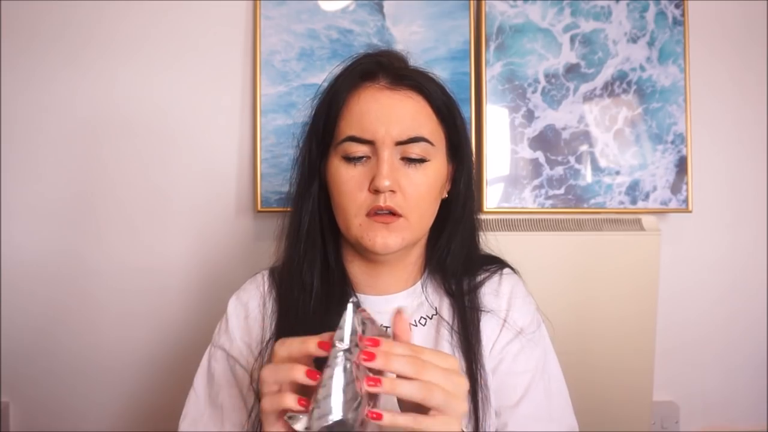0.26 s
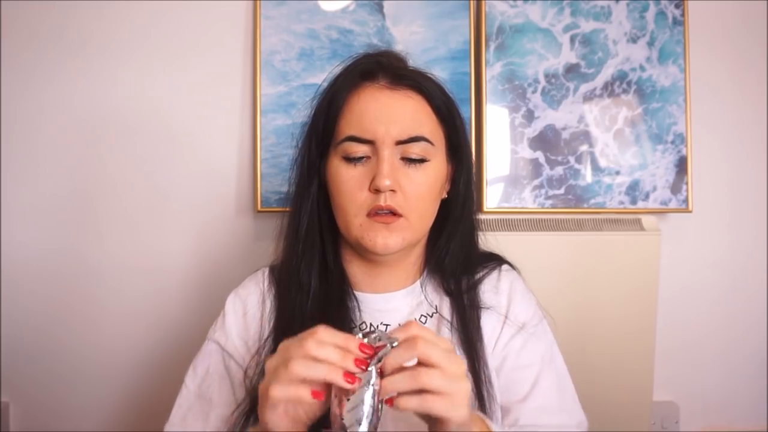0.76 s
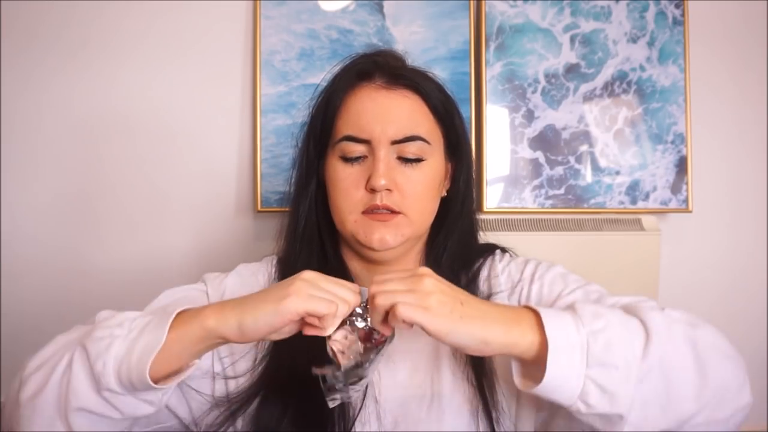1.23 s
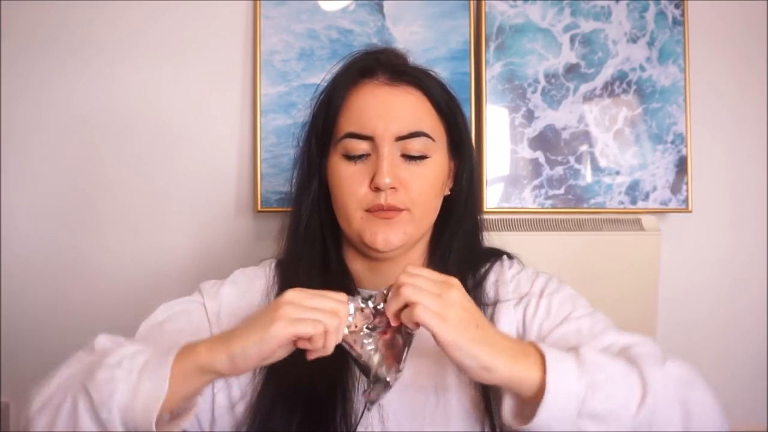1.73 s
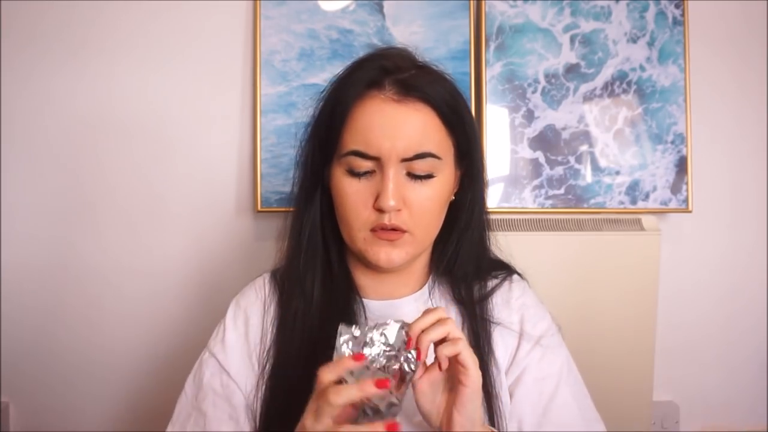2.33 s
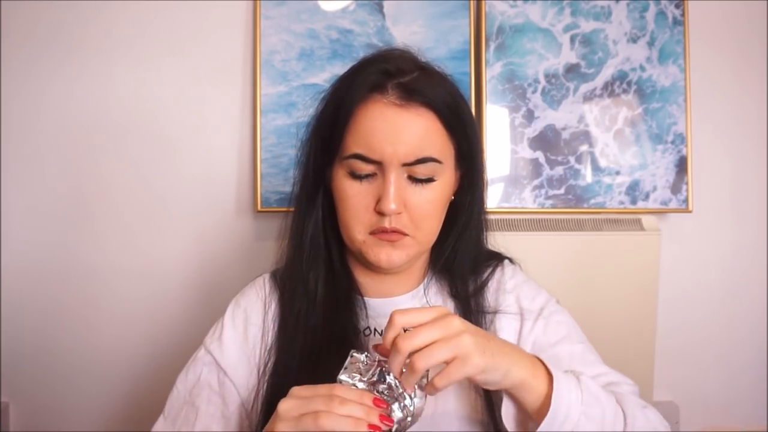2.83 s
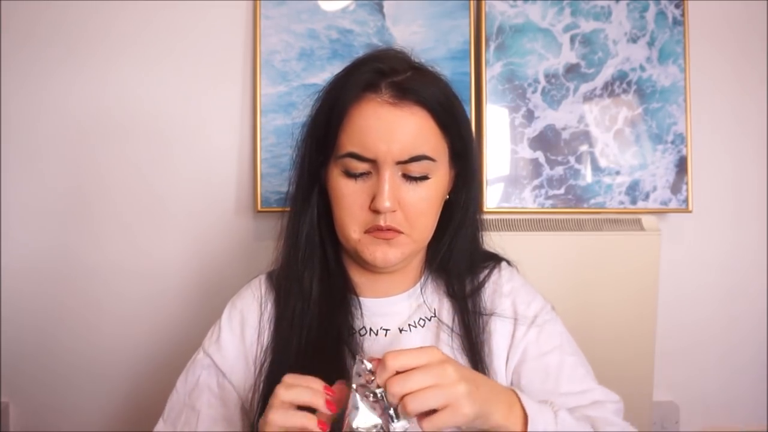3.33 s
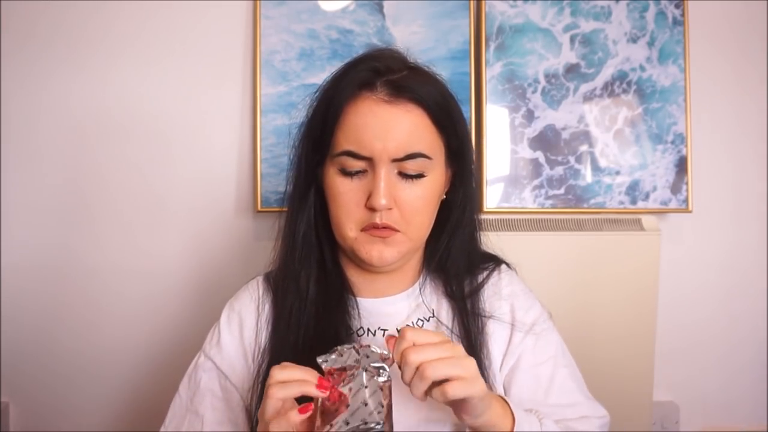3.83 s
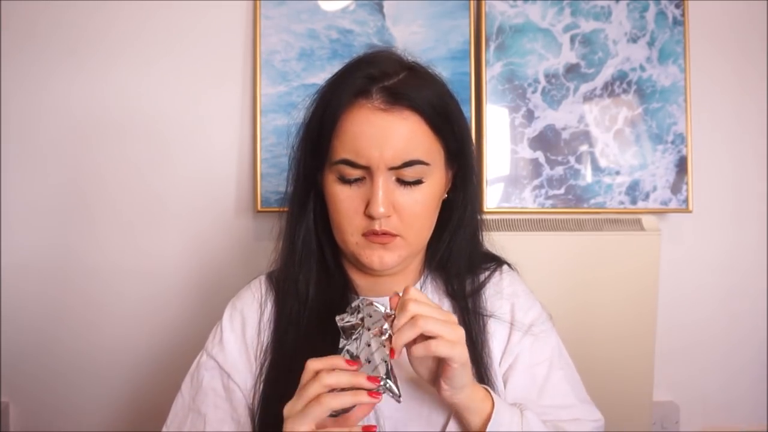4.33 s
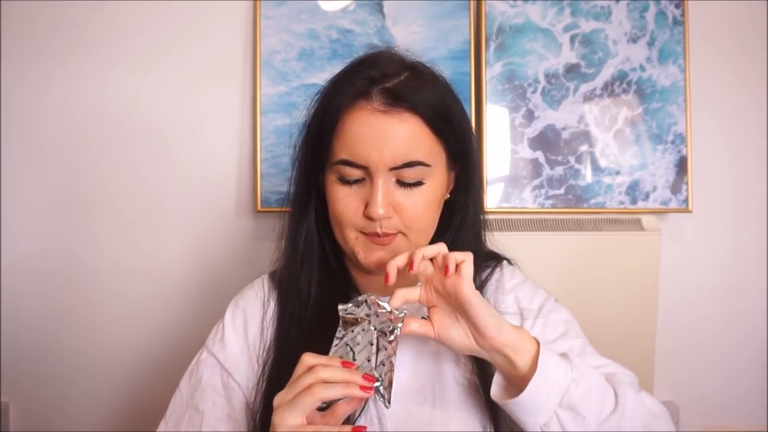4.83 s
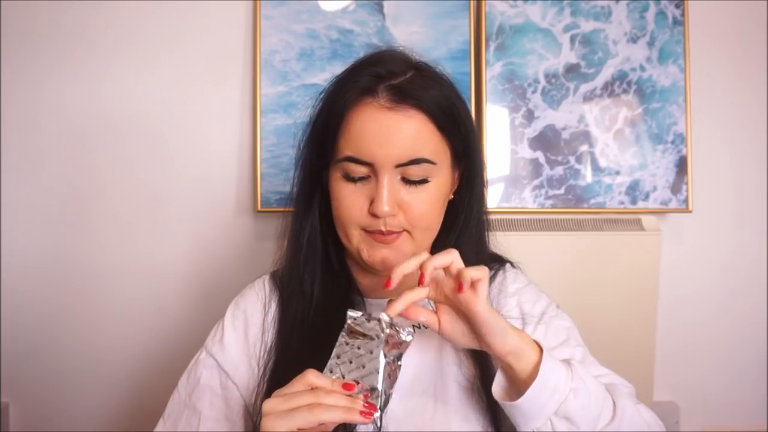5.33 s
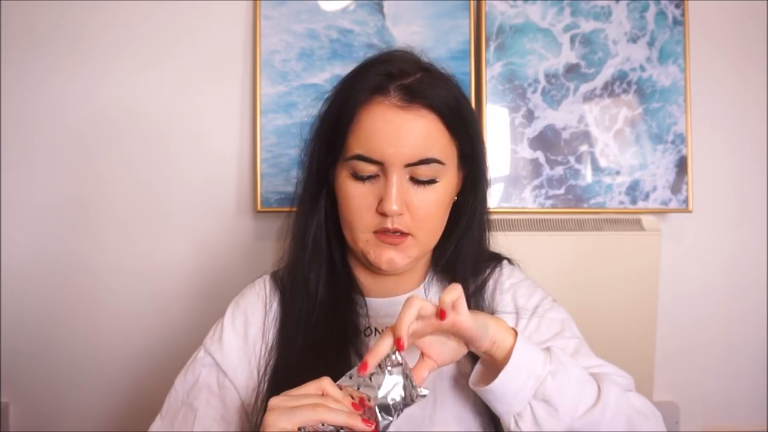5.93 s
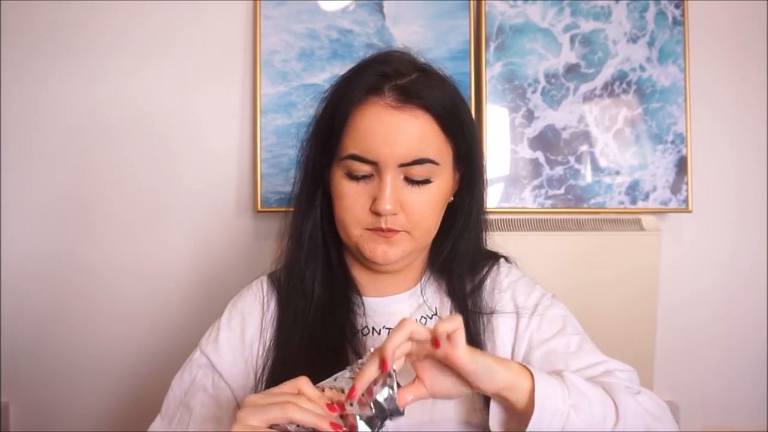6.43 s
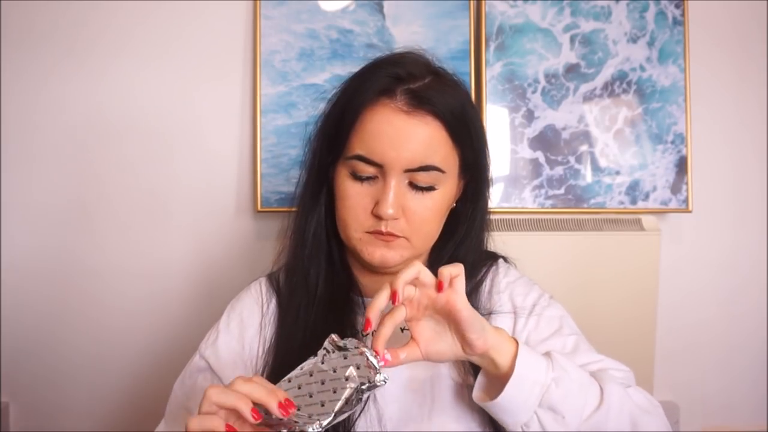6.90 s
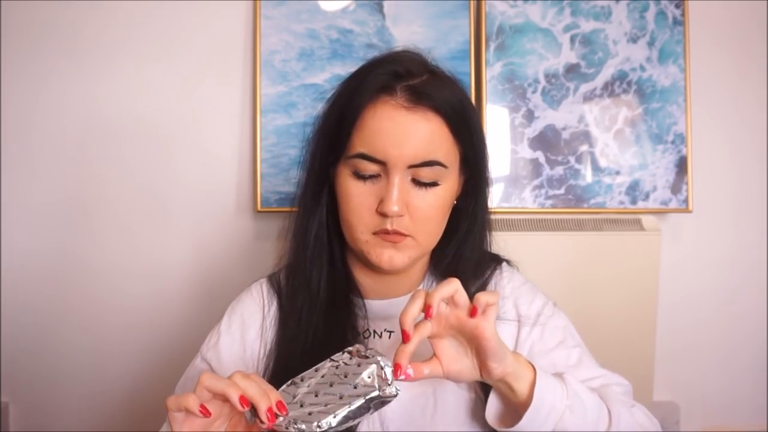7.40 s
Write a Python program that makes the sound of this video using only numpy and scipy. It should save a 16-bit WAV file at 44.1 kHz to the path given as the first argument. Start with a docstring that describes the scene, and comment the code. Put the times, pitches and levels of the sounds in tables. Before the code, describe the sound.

Crisp metallic-foil crackling swells and sinks in irregular bursts, with sharp loud snaps and a brief lull, over very faint hiss.

```python
"""In a quiet, hard-walled room, a small foil bag is torn open and handled close to a two-port microphone.
Each crease that buckles gives a bright crack of noise and a short, damped thump of the facet around it.
Loud single snaps stand over a dense crackle that swells and sinks as the bag is squeezed.
One early reflection and a diffuse tail of a third of a second answer each sound.
A faint coloured hiss and a thin, steady high whistle lie underneath."""
import sys
import numpy as np
from scipy import signal
from scipy.fft import rfft, irfft, next_fast_len
from scipy.io import wavfile
from scipy.ndimage import uniform_filter1d, minimum_filter1d

SR = 44100
rng = np.random.default_rng(int(sys.argv[2]) if len(sys.argv) > 2 else 0)


def unload_wav(signal):
    """Save mono or channel-first audio to the path in sys.argv[1] as 16-bit WAV at rate SR, clipped to [-1, 1]."""
    wavfile.write(
        sys.argv[1],
        SR,
        np.round(np.clip(np.atleast_2d(signal).T, -1, 1) * 32767).astype(np.int16),
    )


N = 337761


def amp(db):
    """Linear gain of a level in dB."""
    return 10 ** (np.asarray(db) / 20)


def unit(x):
    """x scaled to an rms of 1."""
    return x / np.sqrt(np.mean(x ** 2) + 1e-20)


def along(points, hz):
    """Reads a curve of (f/Hz, value) points on a log frequency axis."""
    f, v = np.transpose(points)
    return np.interp(np.log(hz + 1), np.log(f + 1), v)


def causal(points, size):
    """Minimum-phase response with a (f/Hz, level/dB) colour: folding the cepstrum leaves no pre-ringing."""
    hz = np.fft.rfftfreq(size, 1 / SR)
    cepstrum = irfft(np.log(amp(along(points, hz))), size)
    cepstrum[1:size // 2] *= 2
    cepstrum[size // 2 + 1:] = 0
    return np.exp(rfft(cepstrum))


def filtered(x, response):
    """Multiplies the spectrum of x by a response of frequency, padded so that ringing does not wrap."""
    m = 2 * next_fast_len(N // 2 + 8192)
    hz = np.fft.rfftfreq(m, 1 / SR)
    return irfft(rfft(x, m) * response(hz), m)[..., :N]


def place(s, rows):
    """Adds one short waveform per row into the timeline, at its start time in s."""
    at = np.round(s * SR).astype(int)[:, None] + np.arange(rows.shape[1])
    return np.bincount(at.ravel(), rows.ravel(), N + SR)[:N]


def hiss_and_whistle():
    """Noise shaped by a spectral curve, plus a steady sine near the top of hearing."""
    # relative colour of the hiss: f/Hz, density/dB
    hiss_colour = [(35, -51), (60, -23), (418, -4.5), (1790, -0.5), (7160, -12), (15000, -15)]
    # steady tones: f/Hz, rms level/dB
    whistle_tones = [(15622, -69)]
    noise = rng.standard_normal((2, N))
    hiss = filtered(noise, lambda hz: amp(along(hiss_colour, hz)) * (hz < 15900))
    t = np.arange(N) / SR
    whistle = sum(amp(db) * np.sqrt(2) * np.sin(2 * np.pi * hz * t) for hz, db in whistle_tones)
    return amp(-62.0) * unit(hiss) + whistle


def thumps(s, hz, db, cycles, rise):
    """A buckling facet swings a few times: quick swell, then strong damping, both set in cycles."""
    u = hz[:, None] * np.arange(320) / SR  # cycles elapsed
    phase = rng.uniform(0, 2 * np.pi, (len(s), 1))
    swell = 1 - np.exp(-(u / rise) ** 2)
    damping = np.exp(-(u / cycles) ** 2)
    swing = np.sin(2 * np.pi * u + phase) * swell * damping
    return place(s, amp(db)[:, None] * swing / np.abs(swing).max(1, keepdims=True))


def cracks(s, db, life_s):
    """A crease lets go in a brief burst of treble noise; decay times scatter around life_s."""
    # relative colour of a crack: f/Hz, level/dB
    crack_colour = [(2500, -27), (4500, -0.5), (7000, -3.5), (9000, -1.5), (11500, 0.5), (13500, -1),
                    (15600, -8.5), (16300, -33)]
    t = np.arange(256) / SR
    life = life_s * np.exp(.5 * rng.standard_normal((len(s), 1)))
    noise = rng.standard_normal((len(s), len(t)))
    burst = noise * np.exp(-t / life) * (t < t[-1] / 2)  # the silent half leaves room for the filter
    burst = irfft(rfft(burst) * causal(crack_colour, size=len(t)))
    return place(s, amp(db)[:, None] * burst / np.abs(burst).max(1, keepdims=True))


def squeezes():
    """Gains of facets, cracks and panels: each squeeze swells and dies evenly in dB, and powers add."""
    # squeezes of the bag, levels as gain on layers of rms 1: peak t/s, rise/s and fall/s (20 dB before
    # swing), small facets level/dB, cracks level/dB, large panels level/dB
    squeeze_rows = [(.07, 0.64, 0.53, -34, -41, -48.5), (.262, 0.087, 0.16, -34, -40, -37.5),
                    (.332, 0.098, 0.3, -30, -35, -59), (0.47, 0.039, 0.066, -18, -32.5, -28.5),
                    (0.649, 0.12, 0.069, -22.5, -27, -64), (.785, 0.1, 0.34, -32, -34, -66),
                    (1.02, 0.11, 0.29, -26, -29.5, -50), (1.13, 0.31, 0.24, -26, -33.5, -36.5),
                    (1.25, 0.23, 0.057, -24, -28, -39.5), (1.419, 0.21, 0.12, -32, -32, -64),
                    (1.51, 0.12, 0.22, -52, -38, -72), (1.585, 0.073, 0.13, -22.5, -25.5, -33.5),
                    (1.728, 0.064, 0.18, -30.5, -38.5, -39), (2.073, 0.23, 0.19, -37.5, -45, -49.5),
                    (2.227, 0.11, 0.26, -40, -51, -46), (2.322, 0.099, 0.22, -37, -47, -54),
                    (2.387, 0.041, 0.24, -33, -42, -42.5), (2.583, 0.026, 0.019, -28.5, -41, -37),
                    (3.19, 0.092, 0.25, -39, -43, -45), (3.301, 0.058, 0.066, -32, -39.5, -40),
                    (3.486, 0.026, 0.42, -28.5, -45.5, -34), (3.55, 0.11, 0.31, -30.5, -34, -34),
                    (3.761, 0.029, .066, -23, -36, -34), (3.841, 0.059, 0.11, -28.5, -31.5, -35),
                    (4.095, 0.077, 0.06, -27.5, -37, -35), (4.21, 0.078, 0.11, -31, -40, -36),
                    (4.421, 0.12, 0.12, -29, -37, -33.5), (4.736, 0.074, 0.48, -31, -41.5, -41.5),
                    (4.983, 0.19, .09, -27, -33.5, -31.5), (5.141, 0.053, 0.072, -26.5, -39, -40),
                    (5.246, 0.08, 0.25, -32, -39, -58), (5.325, 0.16, .3, -29.5, -35, -39),
                    (5.464, 0.11, 0.027, -23, -30, -45), (5.62, 0.011, 0.63, -33.5, -39, -67),
                    (5.76, 0.19, 0.11, -29, -32, -49), (5.81, 0.12, 0.63, -29.5, -35.5, -38.5),
                    (6.044, 0.11, 0.1, -34, -40, -38.5), (6.188, 0.45, 0.24, -32, -40.5, -50.5),
                    (6.418, 0.048, 0.64, -34, -47, -52), (6.58, 0.37, 0.23, -28, -36.5, -34.5),
                    (6.763, 0.18, 0.14, -30, -41, -36), (6.95, .5, .3, -50, -55.5, -48),
                    (7.05, 0.085, 0.14, -32.5, -45, -52), (7.136, 0.15, 0.3, -27.5, -36.5, -33.5),
                    (7.256, 0.058, 0.12, -37, -38, -35), (7.356, 0.017, 0.064, -29.5, -33, -36),
                    (7.425, 0.068, 0.11, -31.5, -34, -35.5), (7.655, 0.2, .1, -39, -50, -47.5)]
    # factor on the dB range of a rise or fall: facets, cracks, panels
    swings = (1.174, 1.55, 1.47)
    # gain while the bag is only held: facets level/dB, cracks level/dB, panels level/dB
    rest_db = (-72.5, -81, -71)
    peak, rise, fall, *levels_db = np.transpose(squeeze_rows)[..., None]
    t = np.arange(0, N + 32, 32) / SR
    below_db = 20 * np.maximum((peak - t) / np.abs(rise), (t - peak) / np.abs(fall))
    gains = []
    for db, swing, rest in zip(levels_db, swings, rest_db):
        power = amp(rest) ** 2 + (amp(db - swing * below_db) ** 2).sum(0)
        gains.append(np.interp(np.arange(N) / SR, t, np.sqrt(power)))
    return gains


def crackle(count):
    """Many creases buckle at random moments; few are large, and facets differ in size and pitch."""
    # typical small-facet pitch as the grip moves between finer and coarser folds: t/s, f/Hz
    fold_pitch = [(0.0, 2070), (0.08, 2900), (0.13, 2350), (1.38, 2290), (1.41, 2620), (2.43, 2040),
                  (2.47, 2610), (2.64, 1530), (3.03, 2500), (3.69, 2070), (3.73, 2600), (4.12, 1990),
                  (4.26, 2510), (5.29, 1930), (5.5, 2440), (7.66, 2210)]
    when, size, share = rng.random((count, 3)).T
    s = when * N / SR
    size_db = -4.5 * np.log(size + 0.023)
    spread = rng.standard_normal(count)

    facet_hz = np.interp(s, *np.transpose(fold_pitch)) * np.exp(0.31 * spread)
    facets = thumps(s, np.clip(facet_hz, 800, 6000), size_db, cycles=1.78, rise=0.71)
    creases = cracks(s, size_db + 8 * share, life_s=0.0008)

    few = slice(0, count // 5)  # a fifth of the creases also flex a whole panel
    panel_hz = np.clip(600 * np.exp(0.25 * spread[::-1][few]), 300, 1200)
    panels = thumps(s[few], panel_hz, size_db[few], cycles=1.73, rise=0.81)
    return sum(gain * unit(x) for gain, x in zip(squeezes(), (facets, creases, panels)))


def snaps():
    """Loud creases thump and crack; each sets off a weaker neighbour a few milliseconds later."""
    # loud creases, peaks ahead of room and microphone: t/s, facet level/dB, facet f/Hz, crack level/dB
    loud_creases = [(0.0912, -17.5, 2020, -13), (0.1358, -6, 2360, -9.5), (0.2407, -15, 2240, -32),
                    (0.2662, -11, 2520, -7.5), (0.2696, -8.5, 2500, -33), (0.3255, -10, 3000, -13.5),
                    (0.345, -10, 2720, -14), (0.4458, 0, 2620, -9.5), (0.4727, -12, 2600, 0),
                    (0.552, -11.5, 1780, -21), (0.5716, -10, 2180, -11), (0.609, -16, 2220, -41),
                    (0.758, -14.5, 2080, -14), (0.7689, -18, 2770, -11.5), (0.8, -9.5, 2280, -9),
                    (0.8923, -5.5, 2750, -9.5), (0.953, -18, 635, -43), (0.9728, -9, 3550, -13),
                    (1.0155, -21.5, 660, -43), (1.1409, -6, 2240, -4), (1.197, -6, 1960, -7),
                    (1.2172, -25, 2900, -9), (1.2343, -10, 2360, 3), (1.2661, -15, 2260, -19),
                    (1.39, -20, 2340, -14), (1.4273, -5.5, 2870, -7), (1.4352, -20, 3220, -15),
                    (1.4392, -11.5, 2930, -12), (1.4456, -22, 3450, -16), (1.5527, -0.5, 2860, -5),
                    (1.6004, -13, 2580, -17), (1.6856, -17, 2490, -19), (1.7184, -10.5, 2220, -12),
                    (1.7627, -20, 3000, -19), (1.8078, -27, 2740, -25), (1.832, -17.5, 2730, -16.5),
                    (1.931, -17.5, 2120, -18), (1.9733, -31, 1800, -24.5), (2.0672, -12.5, 1960, -24),
                    (2.073, -13, 2580, -8.5), (2.118, -32, 2160, -22), (2.1765, -16.5, 2060, -21),
                    (2.2041, -15.5, 2870, -15), (2.237, -30, 3810, -15), (2.2966, -19, 3500, -27),
                    (2.3235, -12.5, 2500, -23), (2.3885, -12, 1720, -11), (2.3975, -31, 2160, -13),
                    (2.4346, -8.5, 1850, -8), (2.443, -8.5, 3200, -21), (2.5702, -12.5, 1900, -22),
                    (2.656, -16, 1490, -27), (2.804, -34.5, 2450, -40), (2.8397, -38, 2800, -46),
                    (2.9402, -42, 2420, -48), (3.0424, -35.5, 3300, -44), (3.1505, -20, 2340, -21),
                    (3.1747, -17.5, 3200, -18), (3.2384, -15, 2160, -9.5), (3.2967, -14, 2200, -23),
                    (3.472, -32, 2900, -25), (3.4921, -19.5, 1670, -42), (3.588, -8.5, 1940, -19.5),
                    (3.643, -9.5, 2040, -11.5), (3.7611, -7, 2620, -18), (3.7648, -5, 2720, -10),
                    (3.834, -15, 2340, -12), (3.8545, -11, 2440, -9.5), (3.9226, -19.5, 1880, -26),
                    (4.0369, -9, 2160, -25), (4.0491, -9.5, 1930, -22), (4.1712, -15.5, 1790, -44),
                    (4.1861, -11, 1830, -35), (4.2007, -6.5, 2560, -18), (4.223, -7.5, 2050, -11.5),
                    (4.2263, -7.5, 3400, -12), (4.359, -11, 2880, -22), (4.3846, -14.5, 1870, -32),
                    (4.4158, -2, 2400, -14), (4.4652, -13, 1820, -24), (4.5924, -26, 2110, -24.5),
                    (4.6831, -19, 2440, -25.5), (4.7486, -6.5, 2090, -3), (4.757, -17, 1860, -25),
                    (4.7899, -6.5, 2220, -9), (4.901, -13, 3100, -15.5), (4.9287, -13, 2520, -3),
                    (4.9706, -4.5, 2900, -17), (4.9844, -5, 1860, -13), (4.9925, -8, 2160, -7),
                    (5.1364, -11, 1400, -12.5), (5.1488, -7.5, 2260, -24), (5.2578, -10, 2010, -31),
                    (5.2901, -11, 1850, -9.5), (5.3126, -12, 1590, -19), (5.3273, -8, 1740, -37),
                    (5.4541, 2.5, 2370, 1.5), (5.487, -8.5, 2580, -13), (5.6179, -16, 2400, -10),
                    (5.6219, -5, 2580, -34), (5.6257, -24, 2970, -4), (5.7001, -17, 2000, -14),
                    (5.711, -10, 2230, -3.5), (5.791, -10, 2000, -9), (5.8082, -2, 2400, -15),
                    (5.8158, -7, 2240, -9), (5.8721, -12, 2900, -27), (5.911, -6, 2420, -19),
                    (5.985, -18, 2180, -14), (6.035, -11.5, 2670, -29), (6.061, -18, 2090, -13.5),
                    (6.13, -11, 2270, -29), (6.1464, -12, 2140, -16), (6.162, -20, 656, -43),
                    (6.1966, -16, 656, -45), (6.1997, -12, 2270, -35), (6.2356, -13.5, 2940, -13.5),
                    (6.2993, -20, 790, -42), (6.3142, -13.5, 2280, -42), (6.3924, -19, 2350, -23.5),
                    (6.4267, -11, 3100, -20.5), (6.4922, -7.5, 2380, -14), (6.507, -13, 2130, -19),
                    (6.5811, -6.5, 2400, -18), (6.5943, -0.5, 2000, -4.5), (6.6164, -6, 2370, -22),
                    (6.636, -4, 2380, -23), (6.6441, -8.5, 1970, -14), (6.6633, -6, 2290, -14.5),
                    (6.6881, -14.5, 1430, -8.5), (6.751, -8.5, 3170, -12), (6.7952, -6.5, 2370, -7.5),
                    (6.8772, -15.5, 2170, -37), (6.906, -12.5, 2260, -23), (6.9994, -14, 2300, -23.5),
                    (7.008, -19, 2140, -33), (7.0431, -18, 2150, -24), (7.061, -14.5, 1970, -22.5),
                    (7.108, -6, 1690, -21), (7.124, -7.5, 2440, -24), (7.1341, -1.5, 2320, -21),
                    (7.145, -12, 2780, -28), (7.1723, -1, 2460, -17), (7.1762, -8, 2750, -11),
                    (7.1816, -1, 2500, -8), (7.2605, -3, 2360, -9), (7.3602, -9.5, 2520, -19),
                    (7.4142, -0.5, 3400, -1.5), (7.426, -4, 2080, -13), (7.5458, -17.5, 1670, -28),
                    (7.5913, -19, 2720, -39), (7.6291, -21, 2140, -41)]
    s, facet_db, facet_hz, crack_db = np.transpose(loud_creases)
    wait, drop, pitch = rng.random((len(s), 3)).T
    first = thumps(s, facet_hz, facet_db, cycles=1.56, rise=0.4)
    first += cracks(s, crack_db, life_s=0.00033)

    later = s + 0.001006 + .004 * wait
    less_db = -7 - 12 * drop
    second_hz = facet_hz * (.7 + .6 * pitch)
    second = thumps(later, second_hz, facet_db + less_db, cycles=1.4, rise=0.52)
    second += cracks(later, crack_db + less_db, life_s=0.00007)
    return first + second


def ports(x):
    """Direct sound, differing in phase and level at the two ports, plus an early wall reflection."""
    # phase by which the left port leads: f/Hz, lead/rad
    left_lead = [(300, 0), (1800, .5), (3100, .4), (4000, 1.3), (4900, 2.4), (7900, .2), (12000, .3)]
    # level of left minus right: f/Hz, difference/dB
    left_tilt = [(380, 0), (700, -2.5), (1300, -3.8), (4400, -2), (12000, 1)]
    # early reflections: mean delay t/s, level/dB
    reflections = [(.0082, -16)]
    side = np.array([[.5], [-.5]])  # left, right

    def direct(hz):
        return amp(side * along(left_tilt, hz)) * np.exp(1j * side * along(left_lead, hz))

    def walls(hz):
        return sum(amp(db) * np.exp(-2j * np.pi * hz * (s + .00005 * side)) for s, db in reflections)

    return filtered(x, lambda hz: direct(hz) + walls(hz))


def room(x):
    """Decaying noise as a diffuse tail, drawn anew every eighth of a second so no single draw rings as a tone."""
    # decay time over 60 dB: f/Hz, t/s
    decay_time = [(400, 0.25), (2000, 0.24), (6000, 0.32), (14000, 0.2)]
    # likeness of the tail at the two ports: f/Hz, correlation (0 to 1)
    likeness = [(400, 1), (1500, 0.21), (3000, 0.35), (5500, 0.03), (10000, 0.19)]
    wet = np.zeros((2, N + 2 * SR))
    step = SR // 8
    for start in range(0, N, step):
        hz, t, (a, b) = signal.stft(rng.standard_normal((2, SR // 3)), SR, nperseg=256)
        # mixing shared noise a with opposed noise b sets the likeness of the ports
        turn = np.arccos(np.clip(along(likeness, hz), 0, 1))[:, None] / 2
        z = np.cos(turn) * a + np.array([1, -1])[:, None, None] * np.sin(turn) * b
        decay = amp(-60 * t / along(decay_time, hz)[:, None])
        tail = signal.istft(z * decay, SR, nperseg=256)[1]
        tail *= 1 - np.exp(-np.arange(tail.shape[1]) / (0.0026 * SR))  # reflections take time to build up
        tail /= np.linalg.norm(tail[0])
        answer = signal.fftconvolve(x[None, start:start + step], tail, axes=1)
        wet[:, start:start + answer.shape[1]] += answer
    return wet[:, :N]


def scene():
    """Direct and reflected bag sounds take on the microphone's colour; hiss and whistle are added."""
    # microphone colour: f/Hz, level/dB
    mic_colour = [(40, -27), (200, -23.5), (300, -19), (450, -4), (1000, -1.5), (2200, 0.5), (5000, 4.5)]
    bag = crackle(count=7000) + snaps()
    heard = ports(bag) + amp(-2.5) * room(bag)
    coloured = filtered(heard, lambda hz: causal(mic_colour, size=2 * len(hz) - 2))
    return coloured + hiss_and_whistle()


def record(dry):
    """A fast limiter, shared by both ports, turns peaks down; a steep low-pass then cuts the top."""
    top_hz = 16900
    need = np.minimum(1, .97 / (np.abs(dry).max(0) + 1e-9))
    gain = uniform_filter1d(minimum_filter1d(need, size=89), size=45)  # hold about 2 ms, smooth about 1 ms
    return filtered(dry * gain, lambda hz: hz < top_hz)


dry = scene()
out = record(dry)
unload_wav(out)
```